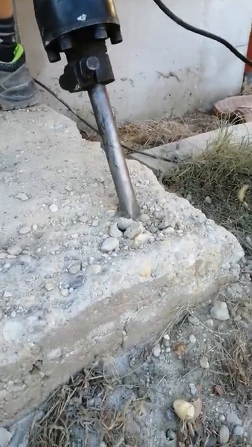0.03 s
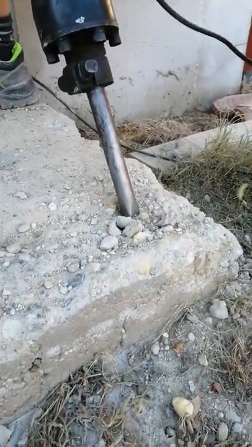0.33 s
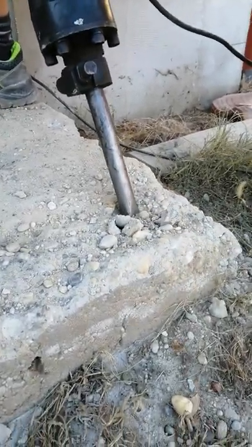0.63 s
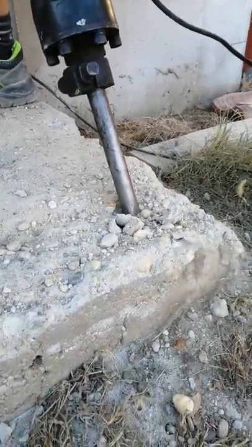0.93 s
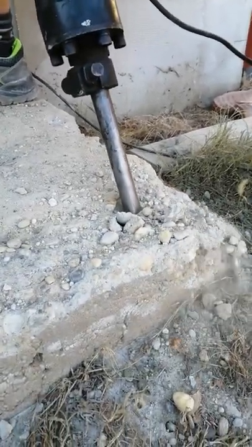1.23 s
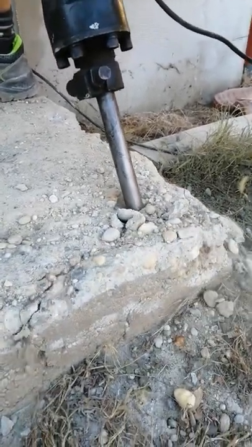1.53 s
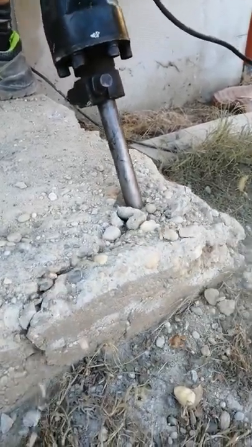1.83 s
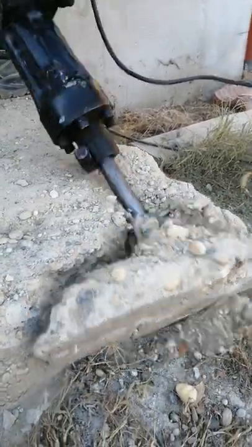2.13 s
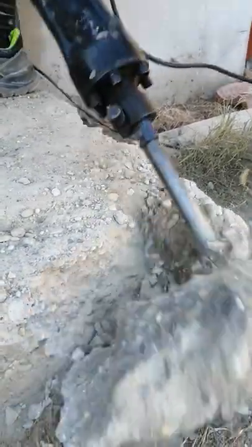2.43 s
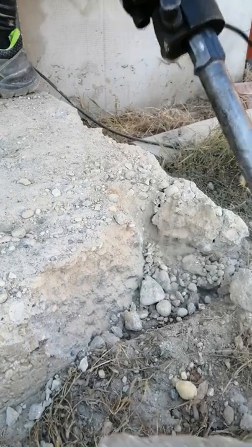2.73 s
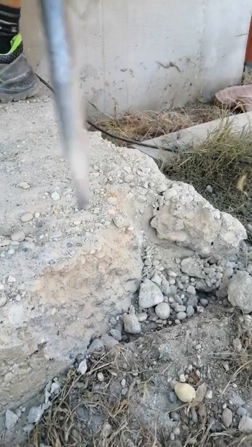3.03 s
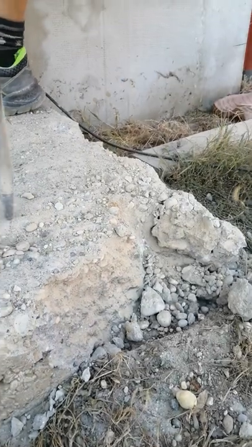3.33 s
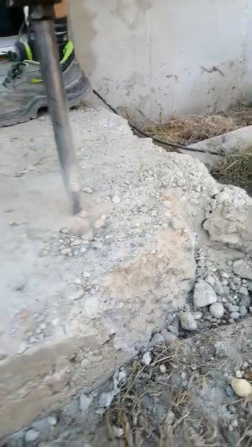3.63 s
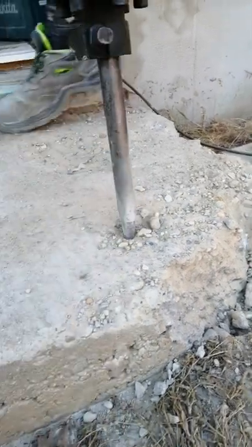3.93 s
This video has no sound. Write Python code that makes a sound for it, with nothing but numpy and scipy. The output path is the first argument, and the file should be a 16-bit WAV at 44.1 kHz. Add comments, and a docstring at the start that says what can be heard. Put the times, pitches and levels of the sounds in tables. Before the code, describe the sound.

An electric jackhammer pounds concrete close up outdoors, with rapid steel blows over dull thuds and rushing motor air. At about 2 seconds the slab gives way with a few harder, ringing knocks. From 2.4 seconds the motor coasts down, whining, rattling and chuffing ever slower while bits of rubble tick and thud. The chisel tip clinks down on the concrete at about 3.6 seconds.

```python
"""Demolition hammer breaks a slab

Outdoors and close up, an electric hammer chisels concrete, one blow per crank turn: the steel rings,
the slab cracks and thuds. The slab breaks away, the freed chisel rings through a few last blows, and
the motor coasts down, chuffing and whining. Rubble tumbles and the tip is set down on the concrete."""
import sys
import numpy as np
from scipy.fft import rfft, irfft, next_fast_len
from scipy.io import wavfile
from scipy.ndimage import map_coordinates

SR = 44100
rng = np.random.default_rng(int(sys.argv[2]) if len(sys.argv) > 2 else 0)


def unload_audio(sound):
    """Save the sound as a 16-bit wav file, at the path given as the first command line argument."""
    columns = np.transpose(np.atleast_2d(sound))
    # keep every value between -1 and 1, then stretch to whole-number steps
    steps = np.round(np.clip(columns, -1, 1) * 32767)
    wavfile.write(sys.argv[1], SR, steps.astype(np.int16))


N = 176400
TIME = np.arange(N) / SR
HIT = np.arange(SR // 5) / SR  # time within a one-shot [s]
ATTACK_S = 0.00041


def amp(db):
    """Decibels to gain."""
    return 10 ** (np.asarray(db) / 20)


def along(points, hz):
    """Read (frequency, value) points on a log frequency axis."""
    freqs, values = np.transpose(points)
    return np.interp(np.log(hz + 1), np.log(freqs + 1), values)


def curves(rows, at=TIME):
    """Automation: each column after the time, read at the given times."""
    times, *columns = np.transpose(rows)
    return [np.interp(at, times, column) for column in columns]


def filtered(x, response):
    """EQ x with a response given as a function of frequency."""
    size = next_fast_len(x.shape[-1] + 4096)
    return irfft(rfft(x, size) * response(np.fft.rfftfreq(size, 1 / SR)), size)[..., :x.shape[-1]]


# how alike the two channels of noise are (frequency [Hz], correlation [0..1])
STEREO_LIKENESS = [(40, 0.43), (200, 0.59), (600, 0.8), (2000, 0.15), (7000, 0.25), (14000, 0.13)]
def noise(spectrum, size=N):
    """Coloured mid/side noise of rms 1, as left and right."""
    hz = np.fft.rfftfreq(size, 1 / SR)
    width = np.arccos(np.clip(along(STEREO_LIKENESS, hz), 0, 1)) / 2
    coloured = rfft(rng.standard_normal((2, size))) * amp(along(spectrum, hz))
    mid, side = irfft(coloured * [np.cos(width), np.sin(width)], size)
    pair = np.array([mid + side, mid - side])
    return pair / pair.std()


def wobble(rate):
    """Smooth random modulation, rate knots a second."""
    return map_coordinates(rng.standard_normal(4096), [TIME * rate], mode="wrap")


def fade(t60, attack):
    """Envelope of a hit: a quick rise, then 60 dB down in t60 seconds."""
    return np.exp(-np.log(1000) * HIT / t60) * (1 - np.exp(-HIT / attack))


def burst(spectrum, t60, attack=ATTACK_S):
    """A dying puff of coloured noise."""
    return noise(spectrum, size=len(HIT)) * fade(t60, attack)


def push(rise_s):
    """One low swing of a heavy mass, peak about 1."""
    u = HIT / rise_s
    return 4 * u * (1 - u / 2) * np.exp(-u)


def add(track, s, sound):
    """Mix a one-shot into the track at s seconds."""
    part = track[:, round(s * SR):][:, :len(HIT)]
    part += sound[..., :part.shape[1]]


# the crank speeds up, then runs down (time [s], speed [turns/s])
CRANK_SPEED = [(0.0, 26.21), (0.3, 25.3), (0.6, 25.76), (0.95, 25.44), (1.25, 26.16), (1.55, 28.64),
               (1.8, 30.33), (1.97, 30.88), (2.1, 28.06), (2.25, 23.54), (2.38, 20.79), (2.65, 17.1),
               (2.85, 14.76), (3.1, 14.08), (3.4, 10.98), (3.62, 8.11), (3.8, 6.5), (4.0, 5.0)]
def turns():
    """Crank turns done so far: the clock of hammering, drone and whine."""
    return np.cumsum(curves(CRANK_SPEED)[0]) / SR


# colour of the open air (frequency [Hz], level [dB])
AMBIENCE_EQ = [(25, 5), (120, 15), (300, 7), (1000, -4), (5000, -29), (15000, -29)]
def ambience():
    """A quiet, dark outdoor bed."""
    return amp(-74) * noise(AMBIENCE_EQ)


# pieces of slab landing (time [s], level [dB], t60 [s])
RUBBLE_HITS = [(2.602, -49, 0.13), (2.891, -52, 0.29), (3.089, -52, 0.074), (3.19, -37, 0.079),
               (3.452, -49, 0.16), (3.551, -48, 0.36), (3.623, -29, 0.03), (3.849, -50.5, 0.049)]
# heavy lumps shaking the ground; stone chips ticking (time [s], level [dB])
GROUND_HITS = [(3.469, -46), (3.624, -35), (3.848, -49)]
CHIP_HITS = [(2.656, -31), (2.685, -34), (2.844, -37), (2.8736, -35), (2.947, -40), (3.1037, -35),
             (3.511, -48), (3.604, -31.5), (3.7674, -43), (3.847, -46), (3.91, -39)]
# dull thump and bright crack, also used by the blows; the tip's scrape (frequency [Hz], level [dB])
THUMP_EQ = [(25, 3), (60, -8), (140, 3.5), (300, -3), (600, -6), (1200, -2), (2500, -32), (6000, -40)]
CRACK_EQ = [(300, -47), (1000, -3), (1600, -11.5), (3100, -4), (4000, -8), (5200, -2.5), (6000, -3.5),
            (7000, 0), (8500, -13.5), (11000, -19.5), (13500, -15.5), (15500, -29)]
SCRAPE_EQ = [(150, 2), (800, -12), (1600, -11), (3000, 5.5), (4200, -11), (5200, -4), (6000, -2),
             (7100, 11), (7900, 17), (8500, -14), (10500, 2), (12000, -15), (15000, -6)]
def debris(set_down_s=3.6228):
    """Lumps thud on the soil, chips tick, and the chisel tip clinks down on the concrete."""
    out = np.zeros((2, N))
    for s, db, t60 in RUBBLE_HITS:
        add(out, s, amp(db) * burst(THUMP_EQ, t60, attack=0.0015))
    for s, db in GROUND_HITS:
        add(out, s, amp(db) * push(rise_s=0.0022))
    for s, db in CHIP_HITS:
        add(out, s, amp(db) * burst(CRACK_EQ, t60=0.023))
    clink = amp(-30.5) * chisel(damping=0.88, tilt_db=-1)
    add(out, set_down_s, clink + amp(-23.5) * burst(SCRAPE_EQ, t60=0.07))
    return out


# glide of the groan (time [s], pitch [Hz], level [dB])
GROAN_GLIDE = [(3.18, 647, -70), (3.25, 630, -47), (3.31, 598, -50), (3.36, 573, -42), (3.42, 552, -45.5),
               (3.48, 520, -76)]
def groan(waver=0.0202):
    """A brief, hollow, wavering tone sinks as the mechanism slows."""
    hz, db = curves(GROAN_GLIDE)
    gate = (TIME > GROAN_GLIDE[0][0]) & (TIME < GROAN_GLIDE[-1][0])
    level = gate * amp(db + 2.6 * wobble(40))
    return level * np.sin(2 * np.pi * np.cumsum(hz * (1 + waver * wobble(120))) / SR)


# faders of the gear whine (time [s], tooth tone [dB], its octave [dB])
WHINE_FADERS = [(0, -70, -70), (1.6, -53, -54), (1.85, -46, -41), (1.97, -43, -40), (2.08, -50, -54),
                (2.3, -54, -54), (2.42, -50, -50), (2.52, -47, -42), (2.61, -44.5, -37.5), (2.69, -48, -49),
                (2.8, -62, -54), (3.2, -68, -55), (3.6, -78, -68), (4, -80, -80)]
# weaker gear tones (pitch [multiple of the tooth tone], level against the octave [dB])
WHINE_PARTIALS = [(1.5, -11), (1.75, -11), (2.3, -11), (3, -18)]
def whine(coasting, teeth_per_turn=82):
    """The gear teeth sing at a multiple of the crank speed, a little rougher under load."""
    tooth_db, octave_db = curves(WHINE_FADERS)
    speed_jitter = (.0095 - .001 * coasting) * wobble(400) * curves(CRANK_SPEED)[0]
    teeth = teeth_per_turn * (turns() + np.cumsum(speed_jitter) / SR)
    tones = [(1, tooth_db), (2, octave_db)] + [(k, octave_db + db) for k, db in WHINE_PARTIALS]
    return sum(amp(db + 2.8 * wobble(120)) * np.sin(2 * np.pi * k * teeth) for k, db in tones)


# resonances of the gear case (frequency [Hz], width [Hz], level [dB])
CASE_MODES = [(2138, 124, -0.5), (2360, 110, -4), (2910, 71, 4), (3270, 86, 4.5), (5190, 99, -2.5),
              (7050, 203, 3)]
def rattle(ticks_per_s=380, top_hz=8000):
    """Slack gears tick unevenly and ring their case, rms 1."""
    def case(f):
        return sum(amp(db) * 1j * f * width / (hz * hz - f * f + 1j * f * width)
                   for hz, width, db in CASE_MODES)
    ticks = rng.random(N) < ticks_per_s / SR
    strength = 0.58 * rng.standard_normal(N) + 0.62 * rng.standard_normal((2, N))  # centre + sides
    ring = filtered(ticks * strength, case)
    ring = filtered(ring, lambda f: 1 / (1 + (f / top_hz) ** 12))
    return ring / ring.std()


# faders of the motor (time [s], rushing air [dB], hollow housing [dB])
MOTOR_FADERS = [(0, -35.5, -55), (1.2, -37, -62), (1.6, -35.5, -65), (1.95, -36.5, -57), (2.25, -37, -46),
                (2.42, -39, -49.5), (2.55, -35.5, -47.5), (2.7, -35, -47), (2.9, -37, -46.5),
                (3.2, -38, -48), (3.36, -40, -45.5), (3.61, -41.5, -44), (3.68, -47, -51.5),
                (3.78, -50.5, -54), (3.9, -51, -64), (3.97, -42.5, -43.5), (4, -42, -62)]
# strokes of the coasting mechanism (time [s], level [dB])
STROKES = [(2.37, -3), (2.406, 0.5), (2.455, -2.5), (2.499, 0), (2.545, -3), (2.58, -2.5), (2.614, -2),
           (2.65, -2.5), (2.684, -2), (2.728, -1), (2.749, 0.5), (2.779, -1.5), (2.808, -1), (2.844, -2.5),
           (2.8754, 0.5), (2.916, -0.5), (2.946, 0.5), (2.984, -1.5), (3.0234, 0), (3.066, 0), (3.1034, -1),
           (3.1433, 0), (3.188, 0), (3.2366, 0), (3.2834, 0), (3.334, -0.5), (3.3902, 1), (3.445, 0.5),
           (3.511, 2.5), (3.578, 0), (3.68, -1.5), (3.766, 2), (3.85, 3), (3.9097, -1.5), (4.0, -8)]
# fan air under load; air when coasting; the hollow housing (frequency [Hz], level [dB])
FAN_EQ = [(60, -14), (250, -2.5), (550, -8), (1000, -4.5), (1350, -3), (2400, 1), (3200, -2.5),
          (4000, -4.5), (5200, 3), (6000, -3.5), (7100, 4.5), (8500, -11.5), (11000, -21), (15000, -14.5)]
COAST_EQ = [(60, -53), (250, -17), (700, 2.5), (1100, 4), (1500, 4), (1850, 5), (2100, 5), (2550, 7.5),
            (3200, 6), (4000, -8.5), (4600, -2.5), (5200, 7.5), (6000, 2), (7100, 5.5), (8500, -17),
            (11000, -14), (15000, -20.5)]
HOUSING_EQ = [(200, -71), (440, -17), (520, -1.5), (565, 1.5), (630, -2.5), (850, -72), (1500, -32.5)]
def motor(coasting, flutter_db=1.6):
    """Fan air rushes; coasting, the mechanism chuffs ever slower, rattles and sounds hollow."""
    air_db, hollow_db = curves(MOTOR_FADERS)
    starts, stroke_db = np.transpose(STROKES)
    stroke = np.interp(TIME, starts, np.arange(len(starts)))
    cycle = stroke % 1
    depth_db = 8.5 * curves([(2.65, 0.38), (2.9, 0.63), (3.5, 0.97)])[0]
    chuff = amp(stroke_db[stroke.astype(int)] - depth_db * cycle ** 1.8)  # sags through each stroke
    fan = noise(FAN_EQ)
    run_down = chuff * (amp(-0.5) * noise(COAST_EQ) + amp(-1) * rattle())
    air = (1 - coasting) * fan + coasting * run_down
    hollow = noise(HOUSING_EQ) * amp(10.9 * (np.sin(np.pi * cycle) - 1.4))  # swells mid-stroke
    return amp(air_db + flutter_db * wobble(300)) * air + amp(hollow_db) * hollow


# buzz of the hammer body (pitch [multiple of the crank speed], level [dB])
BODY_HARMONICS = [(3, 0), (4, -11), (5, -12), (6, -3), (7, -12), (8, -2), (9, -2.5), (10, -8), (11, -2.5),
                  (12, -4), (13, -5), (14, -4), (15, -10), (16, -10), (17, -10), (18, -11)]
def drone(spread=0.83):
    """The loaded hammer body buzzes on between the blows, until the slab gives way."""
    turn = turns()
    _, slab_db = curves(BLOW_FORCE)
    fade_db, = curves([(1.3, 0), (1.55, -1.5), (1.95, -3), (2.15, -43)])
    out = np.zeros((2, N))
    for k, db in BODY_HARMONICS:
        phase = 2 * np.pi * rng.random() + spread * rng.standard_normal((2, 1))
        out += amp(db) * np.sin(2 * np.pi * k * turn + phase)
    return amp(-44.5 + slab_db + fade_db) * out


# modes of the concrete slab (frequency [Hz], level [dB], t60 [s])
SLAB_MODES = [(290, -17, .07), (545, -6.5, .045), (630, -3, .045), (695, -4.5, .06), (860, -3.5, .075),
              (1015, -8, .05), (1120, -6, .04)]
# early reflections off the walls (delay [s], gain [linear])
WALL_ECHOES = [(.0075, .1), (.0158, .14)]
def slab(scatter_db=.6, detune=.003, spread=0.39):
    """The slab thuds nearly the same at each blow, echoed by the walls."""
    hz, db, t60 = np.transpose(SLAB_MODES)[:, :, None]
    level, pitch = rng.standard_normal((2, len(hz), 1))
    polarity = (-1) ** np.arange(len(hz))[:, None]
    modes = polarity * amp(db + scatter_db * level) * fade(t60, attack=0.00026)
    angle = 2 * np.pi * hz * (1 + detune * pitch) * HIT
    thuds = [(modes * np.sin(angle + side * polarity * spread)).sum(0) for side in (1, -1)]
    echoes = [sum(gain * np.interp(HIT - delay, HIT, thud, left=0) for delay, gain in WALL_ECHOES)
              for thud in thuds]
    return np.add(thuds, echoes)


# modes of the steel chisel (frequency [Hz], level [dB], t60 at damping 1 [s])
CHISEL_MODES = [(3090, -13, 0.027), (3244, -16.5, 0.16), (4960, -12, 0.091), (5196, 0.5, 0.058),
                (5640, 2, 0.019), (7270, 5.5, 0.014), (6890, 5, 0.018), (7500, -9, 0.16), (7800, -13, 0.18),
                (10000, -16, 0.085), (12740, -23, 0.15), (14300, -16, 0.04)]
def chisel(damping, tilt_db, scatter_db=1, detune=0.0062, spread=0.57):
    """The steel rings a little differently at each contact; tilt is in dB per octave."""
    hz, db, t60 = np.transpose(CHISEL_MODES)[:, :, None]
    level, pitch, phase, ear = rng.standard_normal((4, len(hz), 1))
    modes = amp(db + scatter_db * level + tilt_db * np.log2(hz / hz[2])) * fade(t60 / damping, ATTACK_S)
    angle = 2 * np.pi * (hz * (1 + detune * pitch) * HIT + phase)
    return np.array([(modes * np.sin(angle + side * spread * ear)).sum(0) for side in (1, -1)])


# colour of the contact transient (frequency [Hz], level [dB])
SNAP_EQ = [(300, 0), (1000, 5.5), (2000, -13.5), (5000, 1.5), (7500, 0.5), (9000, -9), (15000, -10.5)]
def snap():
    """The dry first contact of steel on stone."""
    return burst(SNAP_EQ, t60=0.0088, attack=.0001)


# blows of the freed chisel (time [s], ring [dB], snap [dB], thump [dB], low push [dB])
FREE_HITS = [(2.0494, -7, -20, -7, -51), (2.0846, -1, -21.5, -4.5, -37), (2.1208, -2.5, -22, -6, -31),
             (2.158, 5, -30, -4, -32), (2.198, 3, -29, -3, -44), (2.2357, 1, -17.5, 4.5, -25),
             (2.276, 1.5, -25, 3.5, -52), (2.3201, -2, -24.5, -7.5, -33), (2.3728, -2.5, -32.5, -8.5, -52)]
# their metallic crack (frequency [Hz], level [dB])
FREE_CRACK_EQ = [(300, -7.5), (1000, -10), (1800, -24), (3000, 6), (3900, -40), (4800, 4), (5200, 16.5),
                 (5700, -16), (6300, -22), (7200, 3.5), (7900, -5), (8500, -19), (11500, -19), (13300, -17),
                 (15500, -27)]
def free_blows():
    """As the slab breaks off, the chisel rings harder and shorter and each blow knocks deep."""
    out = np.zeros((2, N))
    for s, ring_db, snap_db, thump_db, push_db in FREE_HITS:
        ring = amp(-21.5) * chisel(damping=3.6, tilt_db=-1.5, scatter_db=4.0)
        crack = amp(-16) * burst(FREE_CRACK_EQ, t60=0.021)
        knock = amp(-26 + thump_db) * burst(THUMP_EQ, t60=0.025) + amp(push_db) * push(rise_s=0.0015)
        add(out, s, amp(ring_db) * (ring + crack) + amp(snap_db) * snap() + knock)
    return out


# weight of the blows into the slab (time [s], steel [dB], slab [dB])
BLOW_FORCE = [(0, 0.5, -2), (.5, 0, 0), (.8, 2, 0), (1.28, 0.5, 0), (1.5, -2, -5.5), (1.85, -5.5, -6),
              (2, -5.5, -7), (2.09, 2, -12.5)]
# the slab rocks; its edge crumbles (time [s], level [dB])
ROCKING_FADER = [(0, -28), (.5, -33), (.8, -34), (1.2, -33), (1.52, -29), (1.8, -40.5), (2, -41),
                 (2.09, -22)]
CRUMBLE_FADER = [(.9, -47), (1.1, -24.5), (1.2, -38), (1.32, -32), (1.5, -54)]
# crushed concrete; rocking slab; crumbling edge; vented air (frequency [Hz], level [dB])
CRUNCH_EQ = [(25, -42), (100, -22), (300, 3.5), (450, 6), (700, 7), (1100, -3.5), (1600, 3), (4000, -61)]
ROCKING_EQ = [(25, -2), (130, -7.5), (250, -4), (600, -73)]
CRUMBLE_EQ = [(600, -21), (1000, -5), (1150, 7), (1450, -9), (2200, -32)]
VENT_EQ = [(6000, -40), (9000, -32), (12700, 27), (15000, -1)]
def hammering(first_turn=.3, break_s=2.035, vent_lead_s=0.0052):
    """One blow per crank turn while the tip bites: a puff of air, then bright steel over dull stone."""
    out, turn = np.zeros((2, N)), turns()
    blow_turns = np.arange(first_turn, np.interp(break_s, TIME, turn))
    for s in np.interp(blow_turns, turn, TIME):
        steel_db, slab_db = curves(BLOW_FORCE, s) + 1.14 * rng.standard_normal(2)
        ring_db = -22 + 0.2 * steel_db  # harder blows favour the ring
        ring = amp(ring_db) * chisel(damping=1.67, tilt_db=-5.5, detune=0.0039)
        steel = ring + amp(-22.5) * burst(CRACK_EQ, t60=0.055) + amp(-25) * snap()
        thud = amp(-26) * slab() + amp(-30) * push(rise_s=0.00031)
        stone = thud + amp(-35.5) * burst(CRUNCH_EQ, t60=0.13)
        rocking_db = curves(ROCKING_FADER, s)[0] - 3 + 2 * rng.standard_normal()
        rocking = amp(rocking_db) * burst(ROCKING_EQ, t60=0.054)
        crumble = amp(curves(CRUMBLE_FADER, s)[0]) * burst(CRUMBLE_EQ, t60=0.053)
        add(out, s, amp(steel_db) * steel + amp(slab_db) * stone + rocking + crumble)
        puff = amp(-44 + steel_db) * burst(VENT_EQ, t60=0.012, attack=0.0015)
        add(out, max(s - vent_lead_s, 0), puff)
    return out


# late arrival in the right channel (frequency [Hz], delay [s])
RIGHT_DELAY = [(100, .0003), (800, .00022), (1500, .00047)]
def placed(x, balance):
    """The tool stands to the left: earlier there, and louder in most bands."""
    def pan(hz):
        gain = amp(np.array([[.5], [-.5]]) * along(balance, hz))
        delay = np.array([[0], [1]]) * along(RIGHT_DELAY, hz)
        return gain * np.exp(-2j * np.pi * hz * delay)
    return filtered(x, pan)


# panning of the tool at work; when coasting (frequency [Hz], left minus right [dB])
WORK_PAN = [(60, 2.5), (140, 10), (230, -5), (500, 4), (1170, -3), (1790, 4.5), (3000, 1.5), (5300, 4),
            (9000, 6.5), (15000, 13.5)]
COAST_PAN = [(60, 6), (110, -2), (200, -1), (380, 17), (700, 11.5), (1290, 1), (2380, 2.5), (4400, 3),
             (8120, 16), (15000, 10)]
def scene():
    """The hammer at work, then lifted and coasting, over a quiet outdoor bed."""
    coasting, = curves([(2.3, 0.14), (2.45, 0.79)])  # crossfade from working to coasting
    tool = hammering() + drone() + free_blows() + motor(coasting) + groan() + debris()
    gears = amp(-3) * whine(coasting) * amp([[1], [-1]])  # leans 2 dB to the left
    return placed((1 - coasting) * tool, WORK_PAN) + placed(coasting * tool, COAST_PAN) + gears + ambience()


def record(dry, ceiling=.35, top_hz=15600):
    """A soft clipper rounds off the highest peaks and a steep low-pass trims the top."""
    soft = dry / (1 + (dry / ceiling) ** 4) ** (1 / 4)
    return filtered(soft, lambda hz: 1 / np.sqrt(1 + (hz / top_hz) ** 120))


dry = scene()
out = record(dry)
unload_audio(out)
```